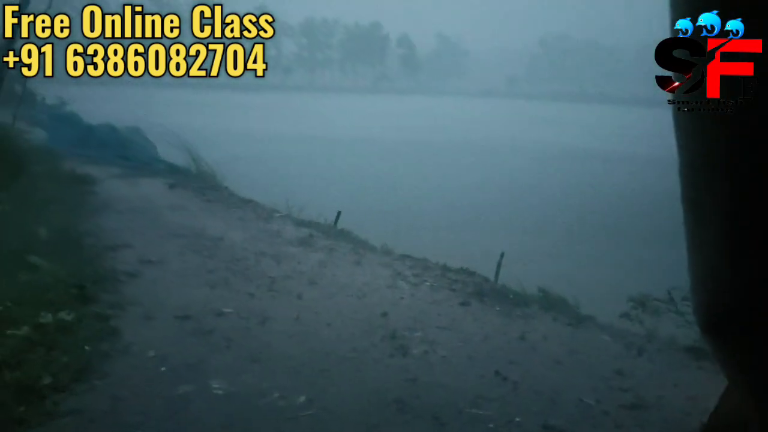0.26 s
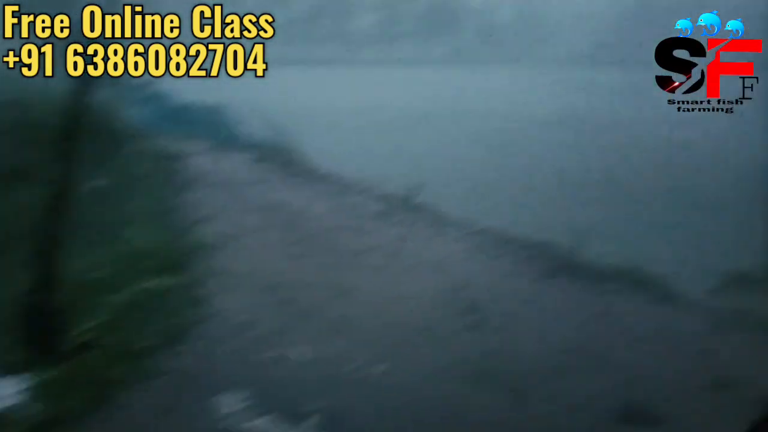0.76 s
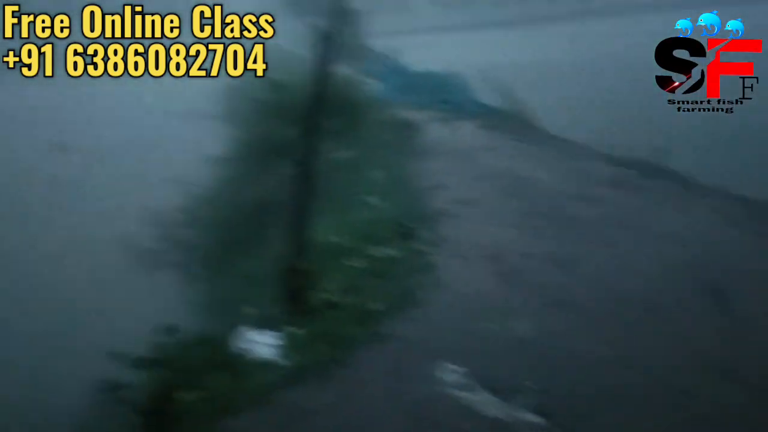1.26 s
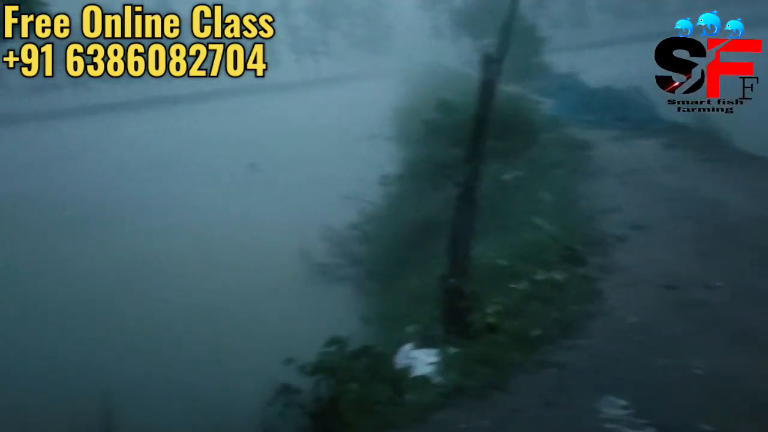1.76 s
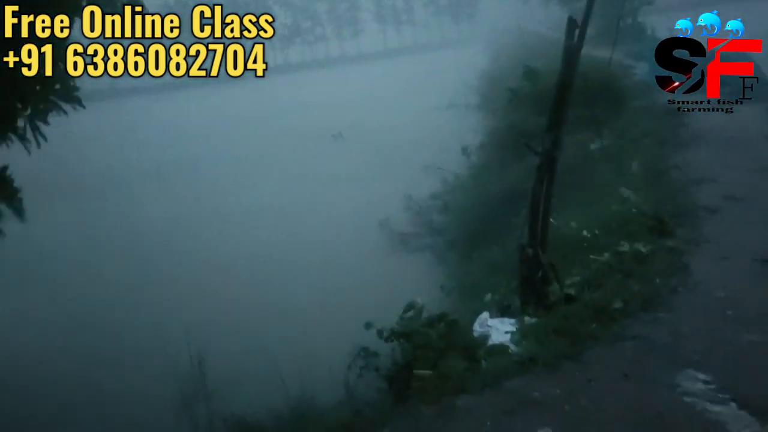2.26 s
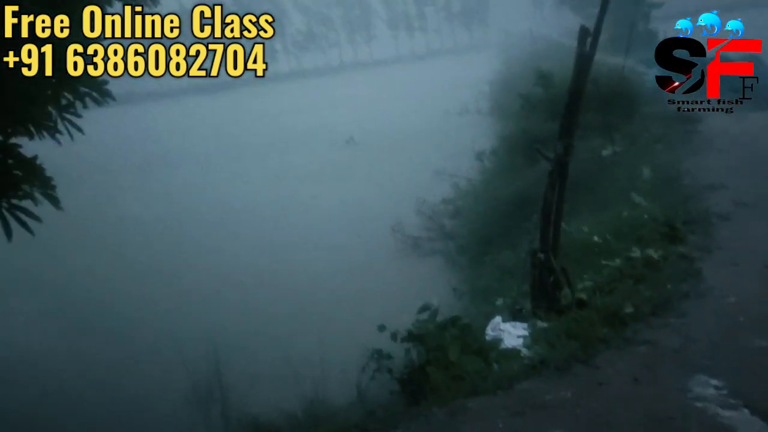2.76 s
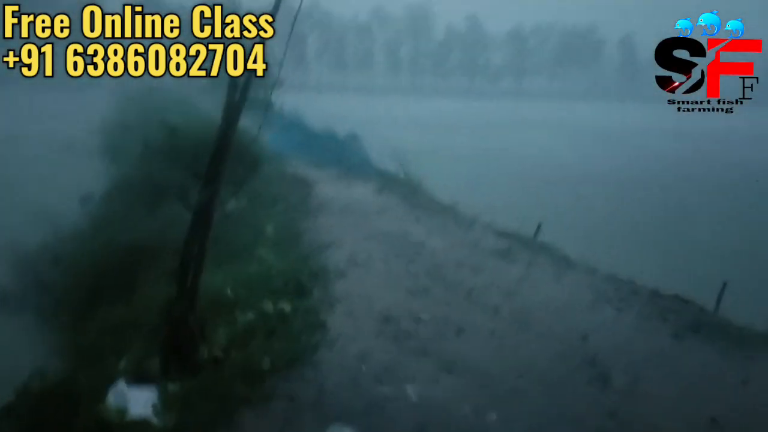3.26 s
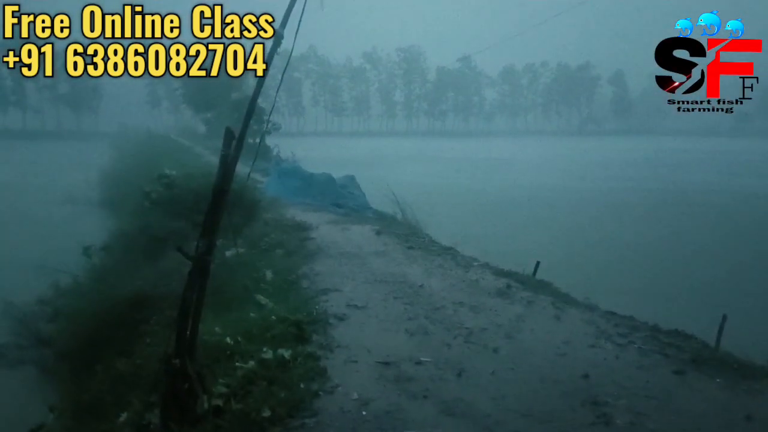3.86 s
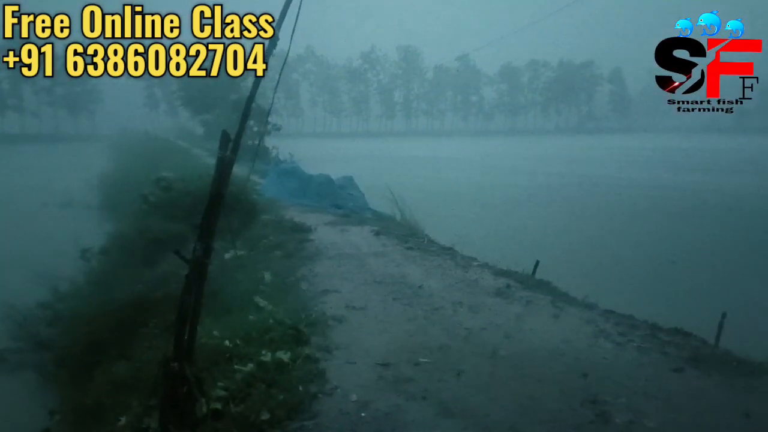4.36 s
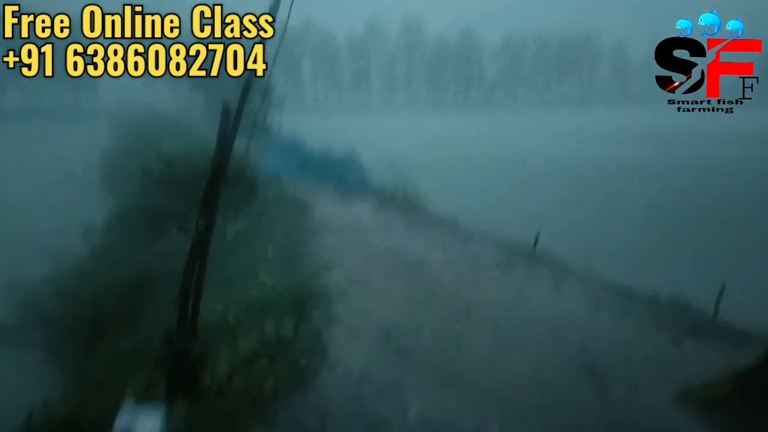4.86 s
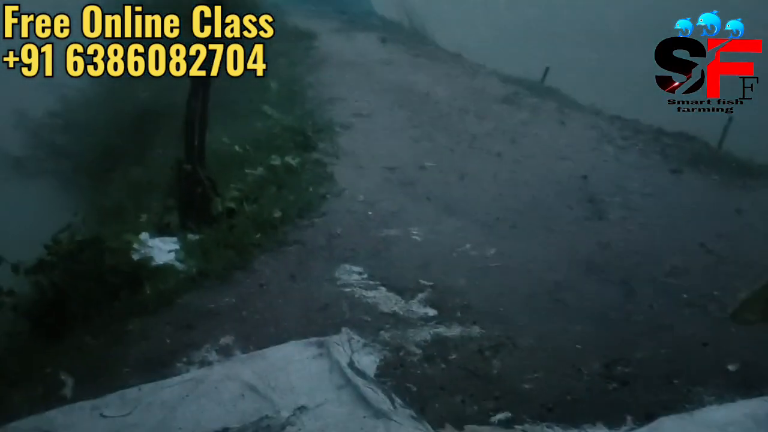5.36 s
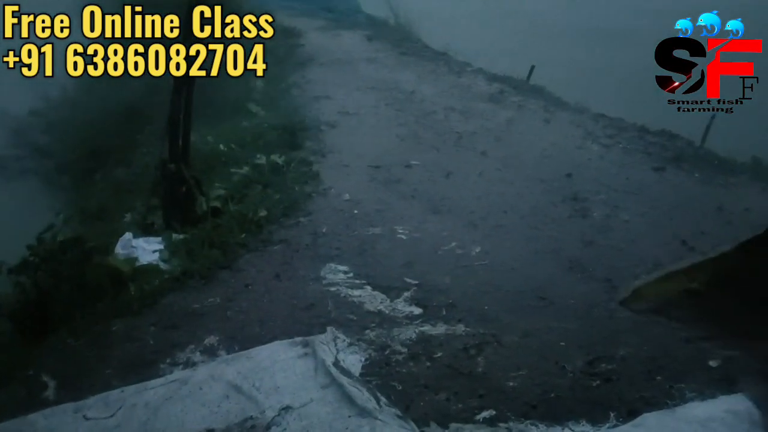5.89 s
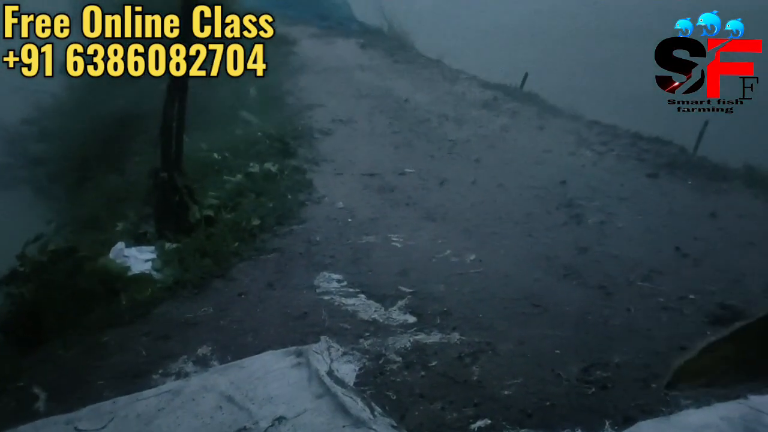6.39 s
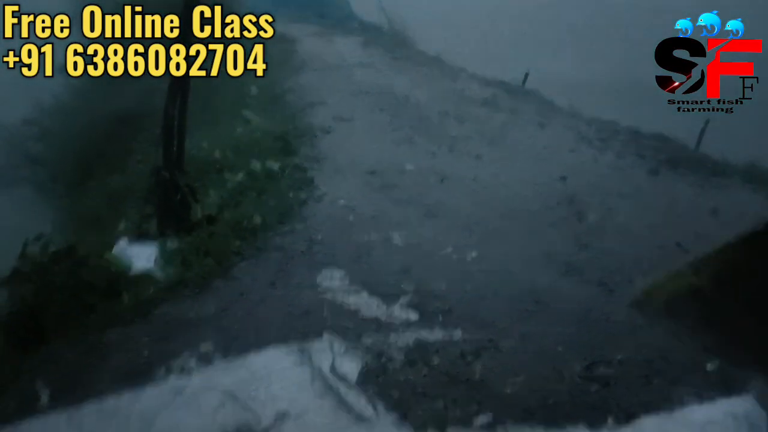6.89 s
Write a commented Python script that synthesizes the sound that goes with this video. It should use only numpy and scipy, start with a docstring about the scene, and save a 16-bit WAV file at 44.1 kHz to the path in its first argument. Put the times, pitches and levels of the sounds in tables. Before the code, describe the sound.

Outdoors at a pond, torrential rain makes a dense, continuous roar all around a hand-held phone. It is strongest in the first second or so, with a few tiny bright drop ticks and one soft low knock, then eases slightly. Midway it fades rapidly to complete silence, and after a short gap returns abruptly, steady to the end.

```python
"""A dense roar of torrential rain on a pond and its earthen bank, heard by a hand-held phone with a port at each end.
Thousands of random drop impacts a second over noise make a diffuse field; the grip on the phone colours each port.
A few close drops tick as short decaying tones with noise, and one knock is a decaying low sine.
Wind on the case is low-frequency noise in lumps. Once the sound fades to silence and cuts abruptly back in."""
import sys
import numpy as np
from scipy import signal
from scipy.fft import rfft, irfft, next_fast_len
from scipy.io import wavfile
from scipy.ndimage import uniform_filter1d, minimum_filter1d, map_coordinates

SR = 44100
rng = np.random.default_rng(int(sys.argv[2]) if len(sys.argv) > 2 else 0)


def digitize_waveform(pressure):
    """Quantize a signal to 16-bit integers and store it at the path in sys.argv[1].

    Rows of a 2-D input are taken as channels; values are limited to [-1, 1].
    """
    field = np.atleast_2d(pressure).T
    bounded = np.clip(field, -1, 1)
    quanta = np.round(bounded * 32767).astype(np.int16)
    wavfile.write(sys.argv[1], SR, quanta)


def linear_from_db(decibels):
    """Turn decibels (scalar or array-like) into linear amplitude factors; 0 gives 1."""
    return 10 ** (np.asarray(decibels, float) / 20)


N = 314433
FRAME = 1024  # samples in a short-time spectrum
CUT_IN_S = 3.3362  # when the sound returns after the silence


def unit(x):
    """Normalization: x scaled to a root-mean-square of 1."""
    return x / np.sqrt(np.mean(np.abs(x) ** 2) + 1e-20)


def curves(rows, t):
    """Linear interpolation in time: each column after the first, read at times t."""
    seconds, *columns = np.transpose(rows)
    return [np.interp(t, seconds, column) for column in columns]


def along(points, hz):
    """Interpolation on a logarithmic frequency axis: each column after the first, read at hz."""
    knots, *columns = np.transpose(points)
    return np.array([np.interp(np.log(hz + 1), np.log(knots + 1), column) for column in columns])


def wobble(rate, t):
    """Band-limited fluctuation: a spline through random knots, rate of them a second."""
    knots = rng.standard_normal(N // 100)
    return map_coordinates(knots, [t * rate])


# How unevenly narrow pitches flicker at random.
# Each row: frequency in Hz, standard deviation in dB.
FLICKER = [(150, 2.5), (500, 2.6), (1200, 2.2), (3000, 2.8), (7000, 3), (12000, 2.5)]


def patter(per_s, spread_db, share):
    """Shot noise: two unrelated streams of random impacts on a smooth far hiss, with flickering narrow pitches."""
    hits = rng.random((2, N)) < per_s / SR
    strength = linear_from_db(spread_db * rng.exponential(size=(2, N)))
    drops = hits * rng.standard_normal((2, N)) * strength
    hiss = rng.standard_normal((2, N))
    rain = np.sqrt(share) * unit(drops) + np.sqrt(1 - share) * hiss  # share of the power in drops
    hz, t, spectrum = signal.stft(rain, SR, nperseg=2 * FRAME)
    random_gain = unit(uniform_filter1d(rng.standard_normal(spectrum.shape), size=2, axis=1))
    flicker = linear_from_db(along(FLICKER, hz).T * random_gain)
    return unit(signal.istft(spectrum * flicker, SR, nperseg=2 * FRAME)[1][:, :N])


def port(table, grip, hz):
    """Linear blending: a per-grip table over frequency, mixed between neighbouring grips."""
    distance = np.abs(np.clip(grip, 0, 3) - np.arange(4)[:, None])
    return along(table, hz).T @ np.clip(1 - distance, 0, 1)


# The strength of the downpour. Each row: time in seconds, level in dB (3 below the mean power of the ports,
# ahead of the limiter), brightness in dB per octave about 1 kHz.
RAIN_LEVEL = [(0, -17.4, 0), (.15, -16.5, 0), (.42, -18, 0), (.78, -17, 0), (.87, -15.3, 0), (1.02, -15, 0),
              (1.2, -16.7, 0), (1.38, -17.5, 0), (1.63, -20.3, .2), (1.9, -19.7, 0), (2.2, -19.6, -.2),
              (2.5, -18.9, -.7), (3.4, -21, .2), (4.12, -19, 0), (4.33, -20.4, 0), (4.55, -19.5, 0),
              (4.8, -20.4, 0), (5.2, -19.5, -.3), (5.4, -20.3, -.3), (5.77, -19.4, 0), (5.92, -17.6, 0),
              (6.25, -19.6, -.2), (6.5, -18.6, -.3), (6.87, -21.4, .2), (7.13, -21.2, .2)]
# The colour of each port. Each row: frequency in Hz, then relative gain in dB in grip 0, grip 1, grip 2, grip 3.
LEFT_COLOUR = [(68.9, -20, -20, -25.5, -25.5), (168, -4.5, -2.5, -1, -1.5), (300, -3, -2, -6, -2.1),
               (650, 0.2, 0, 0, -1.7), (1090, -2.2, -3.5, -4, -5), (1800, -8.8, -11.3, -10, -7.5),
               (2780, -19, -20, -16.5, -15), (4200, -18.5, -21, -22.5, -19.5),
               (5500, -23.5, -22.5, -27.5, -33.5), (6320, -18, -21.5, -21, -27),
               (7040, -26.5, -22.5, -12.5, -23), (7930, -27.3, -26.5, -16.5, -18.5),
               (8720, -33.5, -30, -23.5, -26), (10300, -29.9, -30, -25.5, -26.5),
               (11950, -27.8, -29, -27, -27), (15600, -34, -36, -35, -34.5)]
RIGHT_COLOUR = [(70, -22.5, -22.5, -21, -24.5), (170, -1.5, -1.5, -2.2, -0.5),
                (300, -2.5, -1.3, -3.5, -0.6), (650, 2, 1, 0.5, -0.9), (1300, 3.8, 3.5, 1.2, 0.3),
                (2140, 3, 1, -2.1, -0.8), (2520, 2, -.5, -2, -3.5), (2720, -2.5, -1.2, -2, -4.5),
                (3430, -9, -2.5, -7, -5), (4000, -8, -3.5, -7.5, -5.5), (5480, -15.5, -5.5, -8, -7.5),
                (6100, -24, -11.5, -6.5, -14.5), (6490, -33, -20, -20.3, -24), (7700, -46, -34, -38, -39),
                (9260, -53.5, -36, -40.5, -43.5), (12140, -41, -24, -28.5, -32),
                (15600, -29.5, -20, -20.5, -22)]
# How the phone is held. Each row: time in seconds, left grip 0-3, right grip 0-3, lag of the left port in ms.
HOLD = [(0, 0, 0, .07), (.88, 0, 0, .11), (1.0, 1, .5, .03), (1.5, 1, 1, .03), (1.88, .76, 3, .03),
        (1.95, 2.2, 2.4, .03), (2.8, 2.1, 2.4, .03), (3.2, 3, 2.5, .14), (4.5, 3, 3, .14)]
# The treble is partly alike in both ports.
# Each row: frequency in Hz, then likeness 0-1 in grip 0, grip 1, grip 2, grip 3.
TREBLE_LIKENESS = [(4500, .05, 0, 0, 0), (5400, .6, .1, .05, .03), (6000, .3, .5, .3, .05),
                   (6600, .1, .1, .1, .4), (7200, .03, .03, .03, 0.05), (11000, .05, .1, .1, .05),
                   (13000, .2, .55, .55, .35), (14500, .25, .45, .45, .55), (16000, .25, .3, .3, .5)]


def downpour():
    """Diffuse-field coherence: sound from all round is alike at two ports only for waves longer than their spacing."""
    spacing_m, sound_m_per_s = .13, 343
    hz, t, (first, second) = signal.stft(patter(per_s=3000, spread_db=2.5, share=0.11), SR, nperseg=FRAME)
    f = hz[:, None]
    level_db, bright_db = curves(RAIN_LEVEL, t)
    left_grip, right_grip, lag_ms = curves(HOLD, t)
    # the balance between the ports wavers slightly at random
    pan_db = .3 * wobble(7, t)
    # the level varies slightly at random in patches of pitch and time
    patches = uniform_filter1d(rng.standard_normal(first.shape), size=12, axis=0)
    patches = unit(uniform_filter1d(patches, size=4, axis=1))
    tilt_db = bright_db * np.log2(np.maximum(f, 100) / 1000)
    common_db = 1.15 * patches + 0.43 * wobble(8.2, t) + tilt_db
    left = linear_from_db(port(LEFT_COLOUR, left_grip, hz) + common_db + pan_db / 2)
    right = linear_from_db(port(RIGHT_COLOUR, right_grip, hz) + common_db - pan_db / 2)
    # the lag acts below 1300 Hz, the spacing law below 4500 Hz
    lead = np.exp(2j * np.pi * f * lag_ms / 1000 * (f < 1300))
    alike = 1.013 * np.sinc(2 * f * spacing_m / sound_m_per_s) * lead
    treble_alike = np.clip(port(TREBLE_LIKENESS, right_grip, hz), 0, 1)
    alike = np.where(f < 4500, alike, treble_alike)
    unlike = np.sqrt(np.clip(1 - np.abs(alike) ** 2, 0, 1))
    other = alike * first + unlike * second
    # divide out the slow loudness of the colours, so that the level table governs
    power = np.mean(left ** 2 + right ** 2, axis=0)
    middle = np.sqrt(uniform_filter1d(power, size=12) / 4)
    pair = np.array([left * first, right * other]) * linear_from_db(level_db) / middle
    return signal.istft(pair, SR, nperseg=FRAME)[1][:, :N]


# Close drops. Each row: start in seconds, level in dB ahead of the envelope, pitch in Hz, left over right in dB.
CLOSE_DROPS = [(0.1491, -30.5, 15500, 2.0), (0.178, -20, 14100, 1.5), (0.244, -31, 12900, 5),
               (0.2912, -29, 13500, 8), (1.1154, -30, 15100, -3.5), (1.2087, -27, 14800, -5.5),
               (5.035, -27, 15100, 1.0), (5.3078, -29, 15400, 1.0)]


def ticks():
    """Damped oscillation: each close drop is a short bright splash, a decaying tone with high-frequency noise."""
    t60_s, rise_s = .008, .0003  # 60 dB decay time, time constant of the onset
    out = np.zeros((2, N + SR))
    t = np.arange(SR // 50) / SR
    envelope = linear_from_db(-60 * t / t60_s) * (1 - np.exp(-t / rise_s))
    for start_s, db, hz, pan_db in CLOSE_DROPS:
        tone = np.sin(2 * np.pi * hz * t)
        noise = np.diff(rng.standard_normal(len(t) + 2), 2) / 3  # differencing favours the treble
        splash = (tone + .5 * noise) * envelope * linear_from_db(db)
        sides = linear_from_db([[pan_db / 2], [-pan_db / 2]])
        out[:, round(start_s * SR):][:, :len(t)] += splash * sides
    return out[:, :N]


# A soft knock on the case. Its one row: start in seconds, level in dB at the start of the decay, pitch in Hz,
# 60 dB decay time in seconds.
KNOCK = (.79, -27, 45, .12)


def thud():
    """Impulse response of a damped mode: one low push, felt alike by both ports."""
    start_s, db, hz, t60_s = KNOCK
    t = np.maximum(np.arange(N) / SR - start_s, 0)
    return linear_from_db(db - 60 * t / t60_s) * np.sin(2 * np.pi * hz * t)


# The spectrum of wind on the case. Each row: frequency in Hz, relative gain in dB.
WIND_COLOUR = [(20, -21.5), (40, -5), (70, 4), (110, 6.5), (160, -11), (300, -32)]


def buffet():
    """Turbulent pressure: low-frequency noise in lumps, mostly shared by both ports."""
    level_db, stronger_db, gust_db = -48.5, 3, 2.5  # base level, rise after the silence, slow swing
    t = np.arange(N) / SR
    m = next_fast_len(N)
    colour = linear_from_db(along(WIND_COLOUR, np.fft.rfftfreq(m, 1 / SR)))
    noise = rng.standard_normal((2, N))
    shared, own = irfft(rfft(noise, m) * colour, m)[:, :N]
    lumps = linear_from_db(3 * wobble(22, t) + gust_db * wobble(6, t))
    pair = unit(lumps * np.array([shared + 0.46 * own, shared - .55 * own]))
    return linear_from_db(level_db + stronger_db * (t > CUT_IN_S)) * pair


def scene():
    """Superposition: the pressures of rain, close drops, knock and wind add."""
    return downpour() + ticks() + thud() + buffet()


def limiter(x):
    """Peak limiting: one gain for both ports dips smoothly where a peak would pass the ceiling of 0.93."""
    needed = np.minimum(1, .93 / (np.abs(x).max(axis=0) + 1e-9))
    return x * uniform_filter1d(minimum_filter1d(needed, size=129), size=64)


def band_limit(x):
    """Linear filtering: a zero-phase low cut, 6 dB down at 49 Hz, and a sharp top at 15730 Hz."""
    m = next_fast_len(N)
    hz = np.fft.rfftfreq(m, 1 / SR)
    low_cut = hz ** 2 / (hz ** 2 + 49 ** 2)
    return irfft(rfft(x, m) * low_cut * (hz < 15730), m)[:, :N]


def dropout(t):
    """Amplitude gating: the gain ramps down to silence and jumps back."""
    start_s, end_s, power = 2.615, 2.703, 1.1
    ramp = np.clip((end_s - t) / (end_s - start_s), 0, 1) ** power
    return np.where(t < CUT_IN_S, ramp, 1)


def top_cut(x):
    """Nothing passes above the cut-off."""
    return signal.sosfilt(signal.butter(12, 16050, fs=SR, output="sos"), x)


def record(dry):
    """Signal chain: a limiter tames the peaks, the band is limited, then a quick fade and an abrupt return."""
    limited = band_limit(limiter(dry))
    mix = limited * dropout(np.arange(N) / SR)
    return top_cut(mix)


dry = scene()
out = record(dry)
digitize_waveform(out)
```